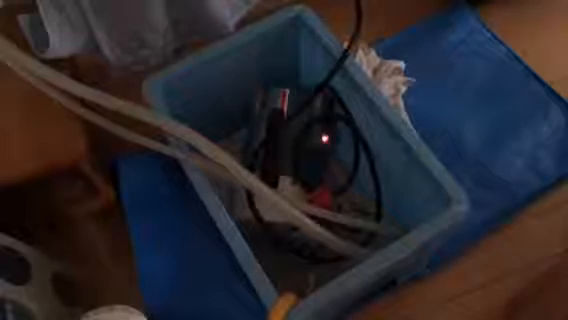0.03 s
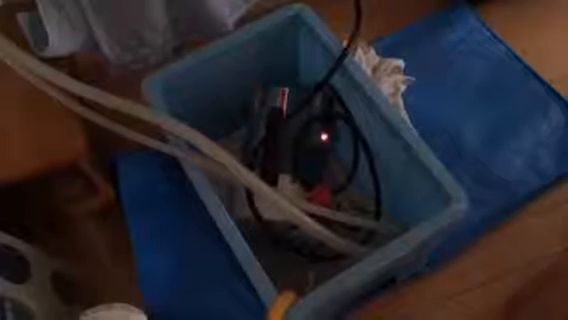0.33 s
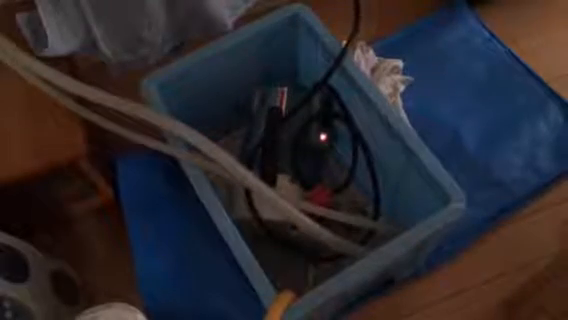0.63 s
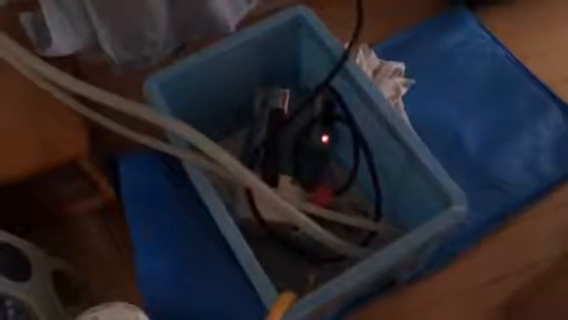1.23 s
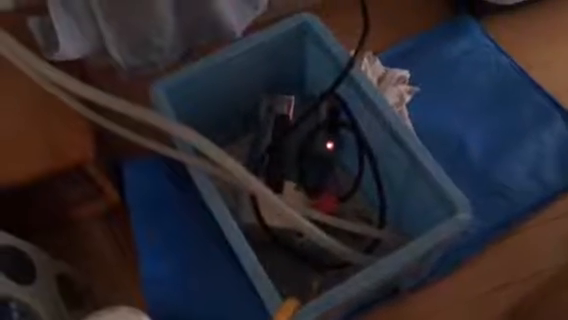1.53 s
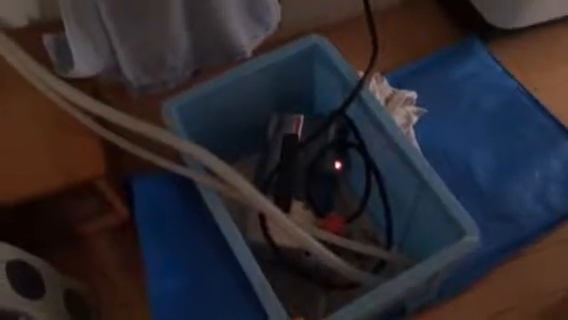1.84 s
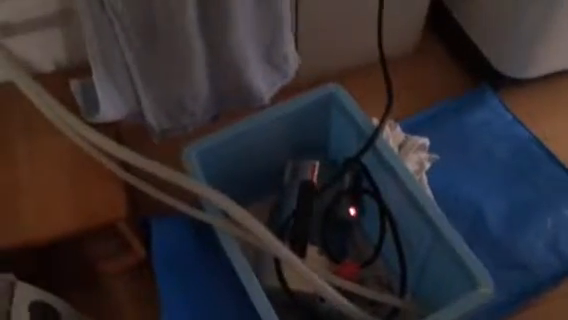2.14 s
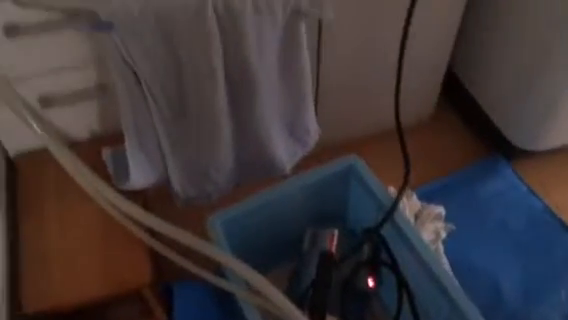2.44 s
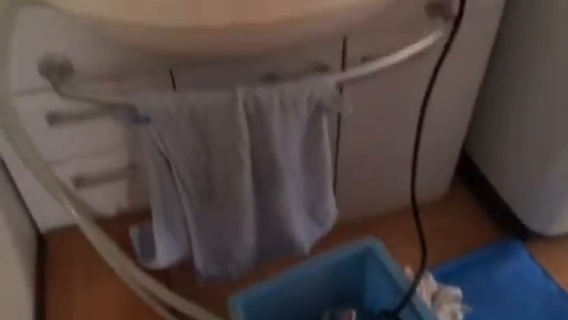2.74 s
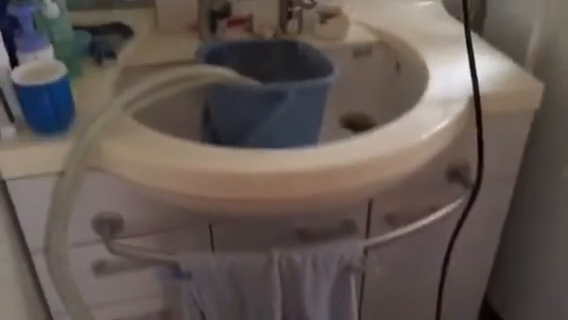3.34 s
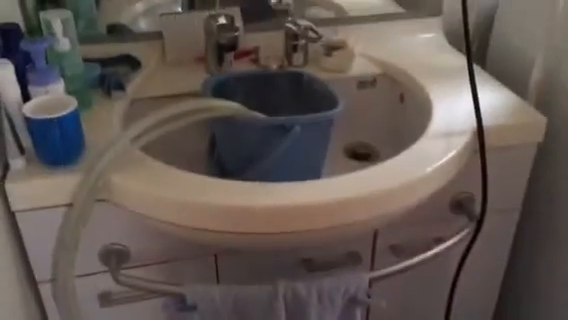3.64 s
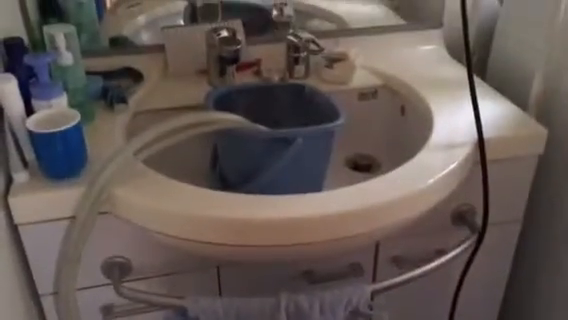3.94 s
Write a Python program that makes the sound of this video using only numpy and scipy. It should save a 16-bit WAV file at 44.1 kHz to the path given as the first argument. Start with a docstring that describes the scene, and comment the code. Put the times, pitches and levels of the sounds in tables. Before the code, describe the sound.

A small electric pump runs from the start in a plastic tub on a bathroom floor: a steady low hum with a fast, even, rattling knock, over a low rumble and faint hiss. From about 2 to 3.5 seconds the microphone rises from the tub to the sink, shifting the drone's tone a little. The pump carries on at much the same level until the end, around 4 seconds.

```python
"""A steady hum with a fast, rattling knock: a small mains pump in a plastic tub on a bathroom floor.
The motor hums; two strokes per turn knock the housing and set the valves chattering.
The tub rumbles on the floor, over a faint hiss. Halfway through, the microphone is lifted
from tub to sink through the room's standing waves, which shifts the colour of the drone."""
import sys
import numpy as np
from scipy import signal
from scipy.fft import rfft, irfft
from scipy.io import wavfile
from scipy.ndimage import uniform_filter1d, map_coordinates

SR = 44100
rng = np.random.default_rng(int(sys.argv[2]) if len(sys.argv) > 2 else 0)


def digitize_waveform(pressure):
    """Quantize a signal to 16-bit integers and store it at the path in sys.argv[1].

    Rows of a 2-D input are taken as channels; values are limited to [-1, 1].
    """
    field = np.atleast_2d(pressure).T
    bounded = np.clip(field, -1, 1)
    quanta = np.round(bounded * 32767).astype(np.int16)
    wavfile.write(sys.argv[1], SR, quanta)


N = 176400

HUM_HZ, HUM_WAVER_DB = 99.95, 0.07
BEAT_DB, BEAT_CREST_S = 0.7, 0.78
TURN_HZ, FIRST_TURN_S = 24.689, 0.145
WANDER_S, STROKE_SCATTER_DB = 0.00003, 0.5
KNOCK_TRIM_DB, CHATTER_TRIM_DB = 0.15, -0.7
LIFT_START_S, LIFT_END_S = 2.1, 3.44

# Motor hum. Each row: time in seconds, level in dB before beat and waver.
HUM_LEVELS = [(0.2, -24.5), (0.82, -24), (1.38, -24.5), (1.41, -24), (3.44, -26), (3.9, -26.5),
              (3.95, -25.5)]
# Strokes. Each row: start within the turn, attack and decay, all in seconds.
STROKE_SHAPES = [(.0033, .0021, 0.0059), (0.0228, 0.0027, 0.0078)]
# Stroke timbre. Each row: frequency in Hz, second stroke over first in dB, repeating share of chatter.
STROKE_TIMBRE = [(303, 1.5, 0.13), (607, -14.5, 0.7), (1050, -2, 0.1), (1790, -1.5, 0.6),
                 (3670, -0.5, 0.74), (6700, -6, 0.82), (9430, 6, 0.9), (11500, -1.5, 0), (15000, 0, .15)]
# Housing knock per harmonic. Each row: frequency in Hz, tub and sink levels in dB before trim.
KNOCK_SPECTRUM = [(25, -80, -83), (49.7, -52.5, -49), (75, -58, -63), (135, -47, -47), (207, -58.5, -56),
                  (375, -61, -57), (437, -50.5, -48), (640, -52.5, -62), (770, -40.5, -53),
                  (860, -54.5, -63.5), (1190, -56.5, -57.5), (1350, -58, -57.5), (1410, -52.5, -51.4),
                  (1620, -54.5, -51.5), (2210, -56.5, -47.5), (2130, -56.5, -56.8), (2400, -53.4, -55.5),
                  (2670, -59, -53.5), (3100, -65, -73), (3250, -54.5, -53), (3300, -76, -68),
                  (4170, -71, -70)]
# Housing, tub and room resonances. Each row: harmonic of the turn, tub and sink levels in dB before trim.
RESONANCES = [(7, -47.2, -47.2), (10, -44.2, -48.9), (11, -46.8, -46.9), (12, -46.3, -41.1),
              (13, -44.2, -51.2), (14, -40.9, -38.3), (17, -46.8, -47.7), (20, -41.7, -43.5),
              (21, -42.4, -34.4), (22, -43.0, -53.3), (24, -39.4, -42.1), (25, -52.1, -41.5),
              (27, -45.0, -50.7), (28, -43.9, -40.7), (29, -42.1, -48.3), (31, -44.8, -44.1),
              (32, -39.2, -46.1), (40, -48.2, -57.9), (42, -40.0, -51.0), (48, -55.2, -51.4),
              (56, -51.6, -46.3), (61, -47.8, -47.9), (62, -48.0, -39.3), (64, -43.7, -38.8),
              (66, -49.8, -38.7), (68, -50.7, -46.6), (69, -47.6, -44.2), (73, -48.6, -51.2),
              (78, -48.6, -42.6), (80, -46.9, -36.6), (82, -57.5, -44.8), (95, -46.1, -58.2),
              (101, -50.7, -44.6), (126, -50.6, -53.1), (130, -51.6, -50.8)]
# Housing response, late in the bass. Each row: frequency in Hz, delay in seconds.
HOUSING_DELAY = [(200, 0.004414), (800, 0.0046), (1100, 0.00312), (1800, 0.003033), (3000, 0.00051)]
# Diffuse knock off tub and walls. Each row: frequency in Hz, gain relative to the strokes.
REFLECTIONS = [(200, 1), (380, 0.66), (520, 0.071), (780, 0.11), (950, 0.86), (1250, 0.99), (1600, 0.11),
               (3000, 0.11)]
# Room crests and nodes passed by the microphone.
# Each row: frequency and half width in Hz, time and half length in seconds, gain in dB.
STANDING_WAVES = [(691, 9.4, 2.58, 0.5, 7.5), (758, 22, 2.6, .3, -16), (730, 16, 3.2, 0.26, -25),
                  (775, 14, 3.15, 0.14, -18), (1037, 21, 2.4, 0.31, 2.5), (1000, 39, 2.85, 0.13, -9),
                  (2020, 91, 2.25, 0.26, -6), (1975, 70, 3.05, 0.14, -6), (1975, 54, 3.42, 0.12, 2),
                  (2100, 900, 2.7, 0.16, 1.5), (790, 25, 2.57, 0.32, 5)]
# Valve chatter and rush. Each row: frequency in Hz, tub and sink densities in dB per Hz before trim.
CHATTER_SPECTRUM = [(130, -72, -73), (220, -77, -93), (653, -85, -65), (1200, -77, -92), (1940, -71, -85),
                    (2740, -76, -72), (3640, -74.5, -75.5), (4180, -73.8, -78.5), (5120, -70.5, -72.5),
                    (5160, -75, -78), (6330, -78.5, -80), (5970, -67, -73.5), (7330, -83, -85),
                    (8340, -81.5, -82), (9250, -72, -72.5), (9170, -75, -75.5), (10800, -86.5, -87),
                    (15500, -88, -92)]
# Valve ticks. Each row: start within the turn in seconds, gain relative to a stroke's peak.
VALVE_TICKS = [(0.019, 0.26), (0.0267, 1)]
# Tub on the floor. Each row: frequency in Hz, density in dB per Hz.
RUMBLE_SPECTRUM = [(20, -95), (32, -82), (44, -57.5), (56, -74), (80, -64), (110, -58.5), (150, -85),
                   (200, -76), (400, -110)]


def motor_hum(t):
    """Hum at twice mains frequency, beating at its offset from the turn's fourth harmonic."""
    beat_db = BEAT_DB * np.cos(2 * np.pi * (HUM_HZ - 4 * TURN_HZ) * (t - BEAT_CREST_S))
    level_db = np.interp(t, *np.array(HUM_LEVELS).T) + beat_db + HUM_WAVER_DB * walk(9)
    return np.sqrt(2) * undb(level_db) * np.sin(2 * np.pi * HUM_HZ * t)


def housing_knock(turns, size=2048, harmonics=165, sway_at_1khz=0.21):
    """Two strokes shake the housing each turn; the harmonics waver and shift as the microphone moves."""
    hz = np.arange(harmonics) * TURN_HZ
    turn_index = np.arange(np.floor(turns[0]), turns[-1] + 2)[:, None]
    turn_s = FIRST_TURN_S + turn_index / TURN_HZ
    gains = knock_gains(turn_s, hz)
    tub, sink = stroke_phasors(hz, gains[0]), stroke_phasors(hz, gains[-1])
    lag_rad = 2 * np.pi * TURN_HZ * np.cumsum(lookup(hz, HOUSING_DELAY))
    phase_rad = np.angle(tub) + mic_lift(turn_s) * np.angle(sink / tub) - lag_rad
    depth = sway_at_1khz * np.sqrt(hz / 1000)
    spectra = gains * np.exp(1j * phase_rad) * (1 + depth * sway(gains.shape)) / np.hypot(1, depth)
    cycles = irfft(spectra, size) * size / np.sqrt(2)
    looped = np.hstack([cycles, cycles[:, :1]])
    return map_coordinates(looped, [turns - turn_index[0], turns % 1 * size], order=1, mode="nearest")


def knock_gains(t, hz):
    """Harmonic amplitudes at the moving microphone, shaped by resonances and standing waves."""
    tub_db, sink_db = lookup(hz, KNOCK_SPECTRUM), lookup(hz, KNOCK_SPECTRUM, column=2)
    for harmonic, *levels_db in RESONANCES:
        tub_db[round(harmonic)], sink_db[round(harmonic)] = levels_db
    room_db = sum(db * np.exp(-((hz - centre_hz) / width_hz) ** 2 - ((t - pass_s) / length_s) ** 2)
                  for centre_hz, width_hz, pass_s, length_s, db in STANDING_WAVES)
    lift = mic_lift(t)
    blend = (1 - lift) * undb(tub_db) + lift * undb(sink_db)
    return blend * undb(room_db + KNOCK_TRIM_DB) * (hz > 0)


def stroke_phasors(hz, gains, size=2048):
    """Phases that gather the harmonics into two strokes, loosened by reflections."""
    t = np.arange(size) / size / TURN_HZ
    direct, walls = np.exp(2j * np.pi * rng.random((2, len(hz))))
    cycle = irfft(gains * direct, size)
    first, second = (rfft(cycle * burst(t, *shape))[:len(hz)] for shape in STROKE_SHAPES)
    reflected = lookup(hz, REFLECTIONS) * gains * walls
    return np.exp(1j * np.angle(first + undb(lookup(hz, STROKE_TIMBRE)) * second + reflected))


def sway(shape, length_turns=10):
    """Slow random drift of each harmonic's level and phase; unit spread."""
    noise = rng.standard_normal(shape) + 1j * rng.standard_normal(shape)
    window = np.exp(-((np.arange(41) - 20) / length_turns * 2) ** 2)
    drift = signal.fftconvolve(noise, window[:, None], "same", axes=0)
    return drift / drift.std()


def valve_chatter(turns, lift, room_wash=0.33):
    """Each stroke sets its valve chattering; ticks add sharp peaks and the room fills the gaps."""
    t, hz = turns / TURN_HZ, bin_hz()
    ticks = sum(gain * burst(t, start_s, attack_s=0.0001, decay_s=0.00026)
                for start_s, gain in VALVE_TICKS)
    second_gain = undb(lookup(hz, STROKE_TIMBRE))
    repeat_share = lookup(hz, STROKE_TIMBRE, column=2)
    spectrum = 0
    for shape, gain, peaks in zip(STROKE_SHAPES, (1, second_gain), (ticks, 0)):
        envelope = np.sqrt((burst(t, *shape) + peaks) ** 2 + room_wash ** 2 / 2)
        envelope /= np.sqrt(np.mean(envelope ** 2))
        repeating = np.sqrt(repeat_share) * rfft(envelope * rattle(turns))
        fresh = np.sqrt(1 - repeat_share) * rfft(envelope * rng.standard_normal(N))
        spectrum += (repeating + fresh) * gain / np.hypot(1, second_gain)
    white = irfft(spectrum, N)
    tub, sink = (colour(white, lookup(hz, CHATTER_SPECTRUM, c) + CHATTER_TRIM_DB) for c in (1, 2))
    return (1 - lift) * tub + lift * sink


def rattle(turns, memory=0.92, size=1786, count=104):
    """Noise that nearly repeats from turn to turn."""
    cycles = rng.standard_normal((count, size))
    for k in range(1, count):
        cycles[k] = memory * cycles[k - 1] + np.sqrt(1 - memory ** 2) * cycles[k]
    return map_coordinates(cycles.ravel(), [(turns - np.floor(turns[0])) * size], order=3, mode="mirror")


def flare(x, depth_db=0.8, bands=9):
    """Overlapping bands, dividing the treble, swell and fade independently."""
    spectrum, centres_hz = rfft(x), np.geomspace(2500, 12000, bands)
    return sum(irfft(spectrum * np.interp(bin_hz(), centres_hz, band), N) * undb(depth_db * walk(6.19))
               for band in np.eye(bands))


def tub_rumble():
    """Low noise of the tub shaking on the floor."""
    return colour(rng.standard_normal(N), lookup(bin_hz(), RUMBLE_SPECTRUM))


def hiss():
    """Faint white noise."""
    return colour(rng.standard_normal(N), db_per_hz=-97)


def mic_lift(t):
    """Microphone position: 0 at the tub, 1 at the sink."""
    return np.clip((t - LIFT_START_S) / (LIFT_END_S - LIFT_START_S), 0, 1)


def burst(t, start_s, attack_s, decay_s):
    """Linear rise and exponential decay, once per turn."""
    age_s = (t - start_s) % (1 / TURN_HZ)
    return np.minimum(age_s / attack_s, 1) * np.exp(-np.maximum(age_s - attack_s, 0) / decay_s)


def walk(rate_hz):
    """Random steps, smoothed twice; unit spread."""
    hold = int(SR / rate_hz)
    steps = np.repeat(rng.standard_normal(N // hold + 2), hold)
    smooth = uniform_filter1d(uniform_filter1d(steps, hold), hold)[:N]
    return smooth / smooth.std()


def colour(white, db_per_hz):
    """Shape unit-rms white noise to a spectral density."""
    return irfft(rfft(white) * undb(db_per_hz) * np.sqrt(SR / 2), N)


def lookup(hz, table, column=1):
    """Table column interpolated over log frequency."""
    rows = np.array(table, float)
    return np.interp(np.log(np.maximum(hz, 1)), np.log(rows[:, 0]), rows[:, column])


def bin_hz():
    """Full-length FFT bin frequencies."""
    return np.arange(N // 2 + 1) * SR / N


def undb(db):
    """Decibels to gain."""
    return 10 ** (np.asarray(db) / 20)


def scene():
    """Hum, slightly uneven strokes, rumble and hiss; mono."""
    t = np.arange(N) / SR
    turns = (t - FIRST_TURN_S + WANDER_S * walk(2.78)) * TURN_HZ
    strokes = housing_knock(turns) + flare(valve_chatter(turns, mic_lift(t)))
    strokes *= undb(STROKE_SCATTER_DB * walk(40))
    rumble = tub_rumble()
    return (motor_hum(t) + strokes + rumble + hiss())[None]


def record(dry, start_s=0.12, fade_s=0.001, low_hz=36, high_hz=15800):
    """The microphone opens after a brief silence and cuts deep bass and top treble."""
    gate = np.clip((np.arange(N) / SR - start_s) / fade_s, 0, 1)
    highpass = signal.butter(4, low_hz, "high", fs=SR, output="sos")
    lowpass = signal.ellip(10, 0.1, 80, high_hz, fs=SR, output="sos")
    return signal.sosfilt(lowpass, signal.sosfilt(highpass, dry) * gate)


dry = scene()
out = record(dry)
digitize_waveform(out)
```